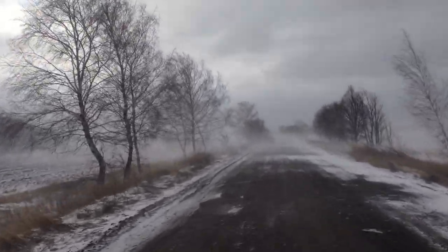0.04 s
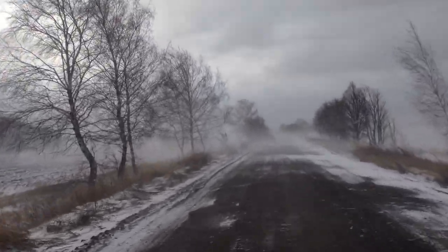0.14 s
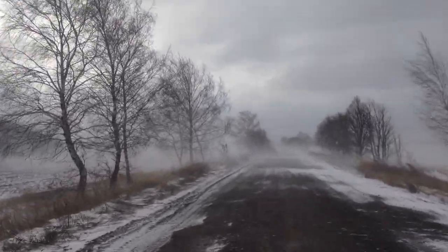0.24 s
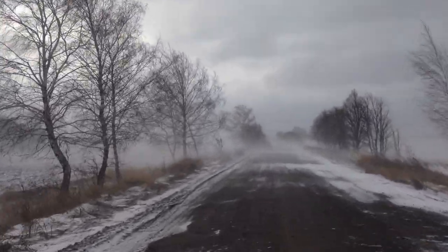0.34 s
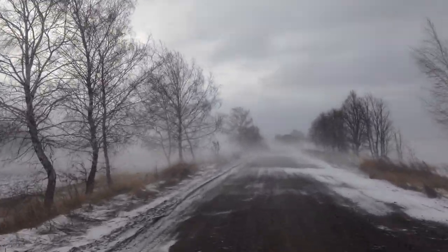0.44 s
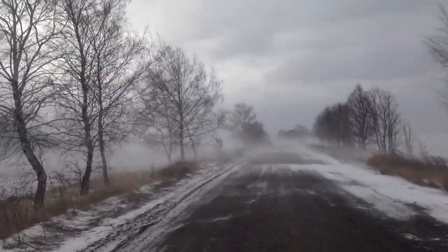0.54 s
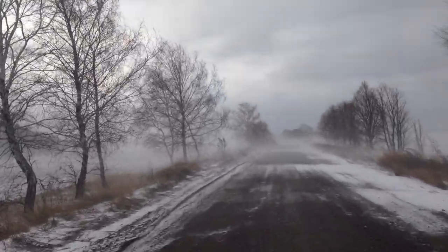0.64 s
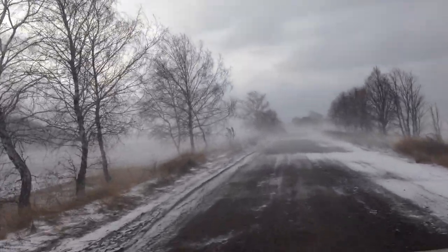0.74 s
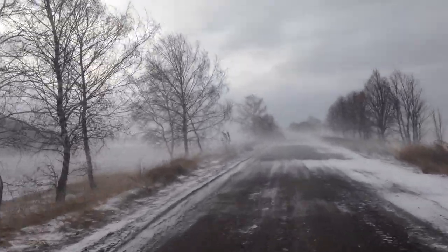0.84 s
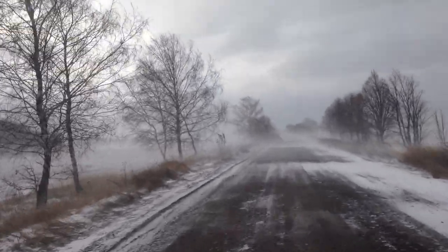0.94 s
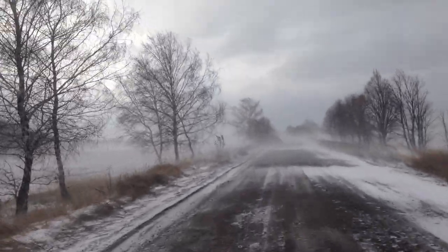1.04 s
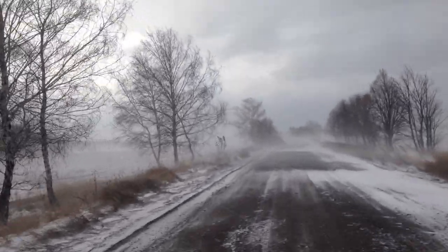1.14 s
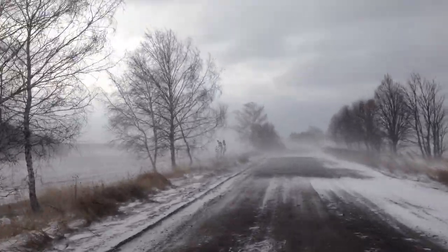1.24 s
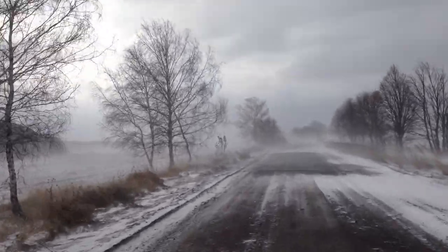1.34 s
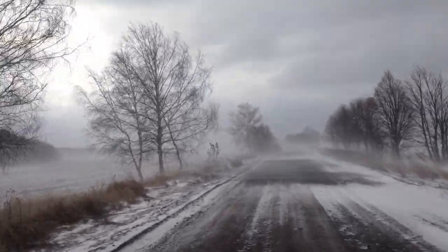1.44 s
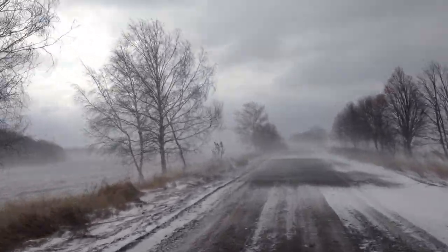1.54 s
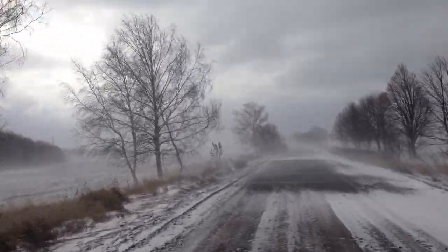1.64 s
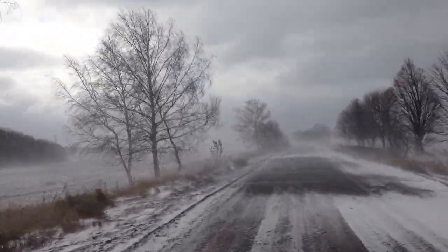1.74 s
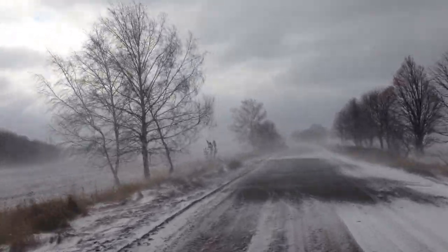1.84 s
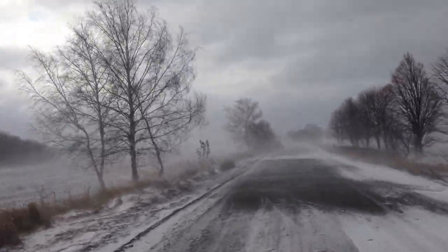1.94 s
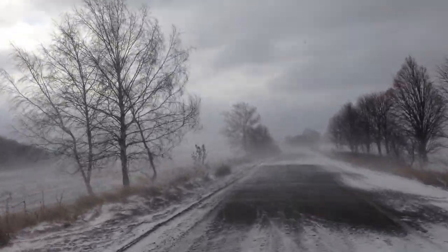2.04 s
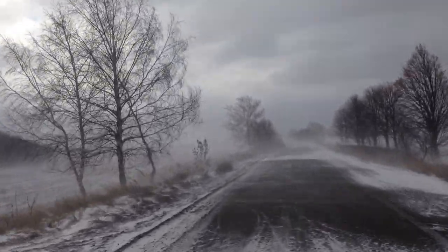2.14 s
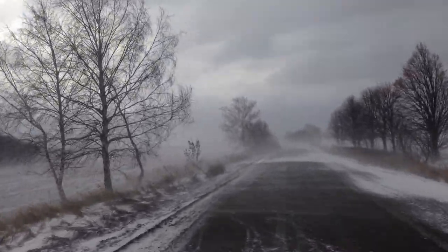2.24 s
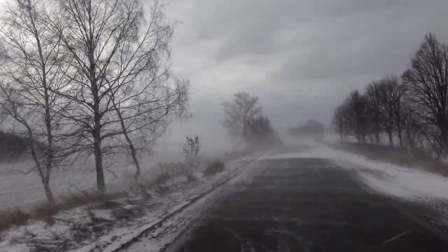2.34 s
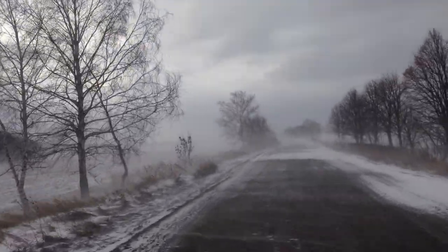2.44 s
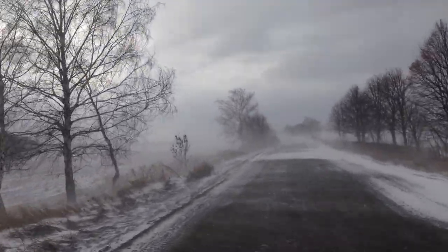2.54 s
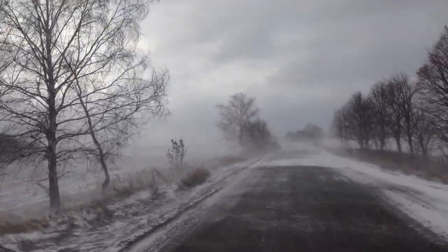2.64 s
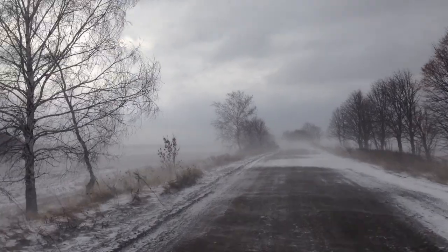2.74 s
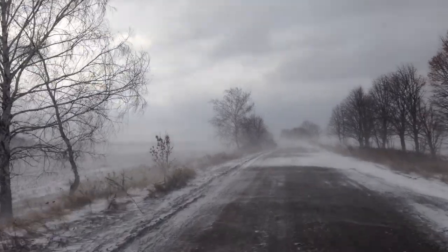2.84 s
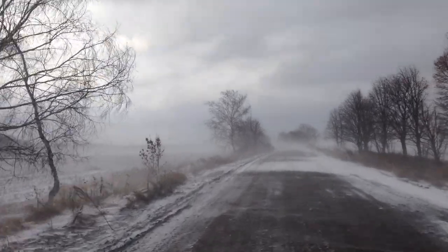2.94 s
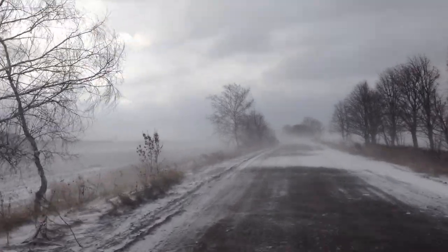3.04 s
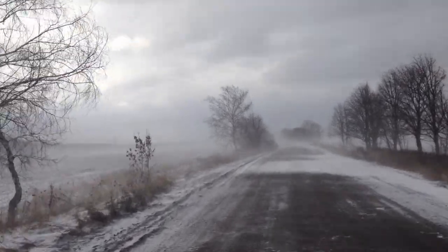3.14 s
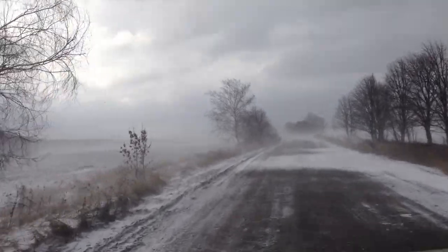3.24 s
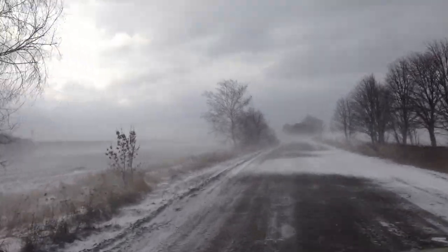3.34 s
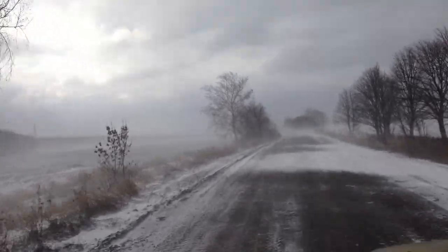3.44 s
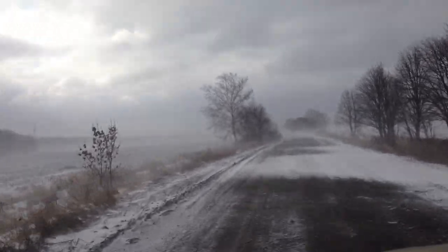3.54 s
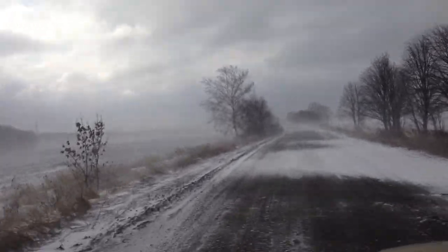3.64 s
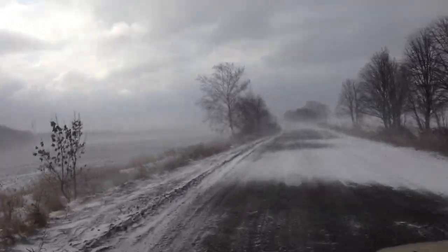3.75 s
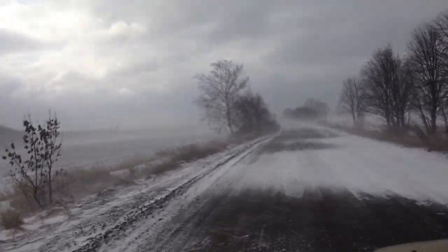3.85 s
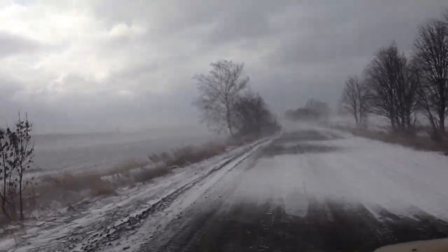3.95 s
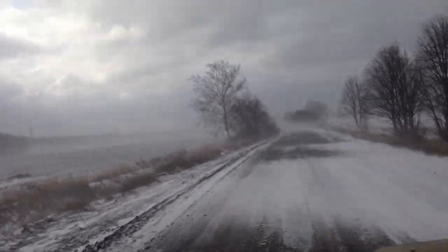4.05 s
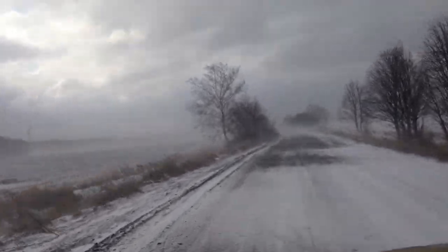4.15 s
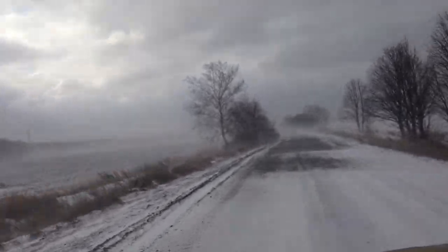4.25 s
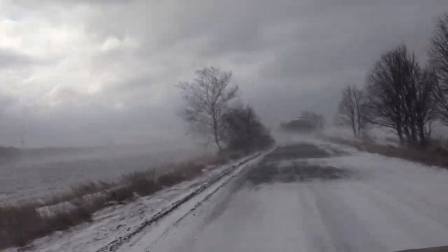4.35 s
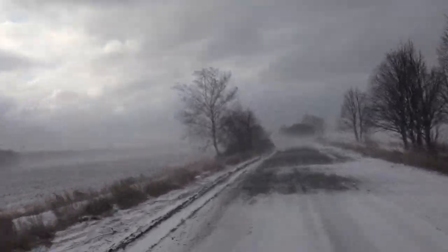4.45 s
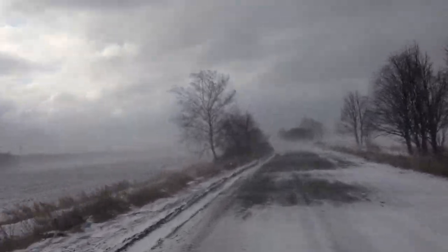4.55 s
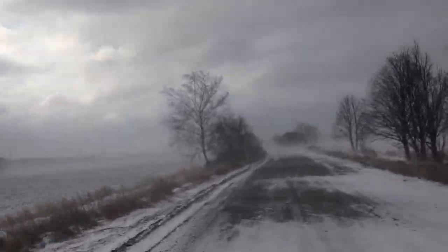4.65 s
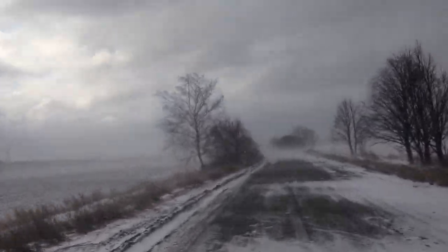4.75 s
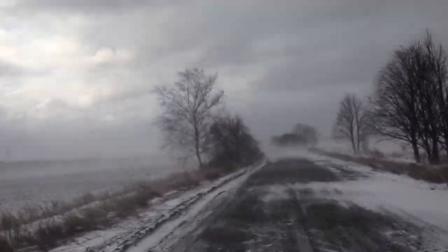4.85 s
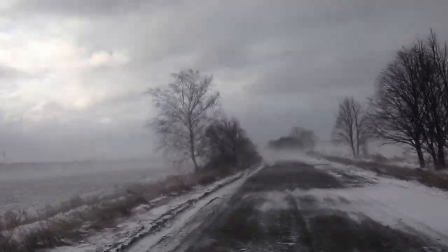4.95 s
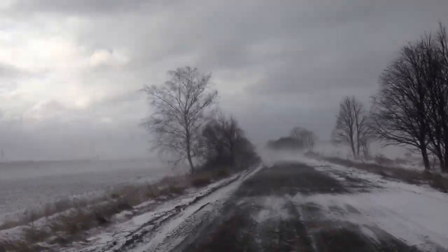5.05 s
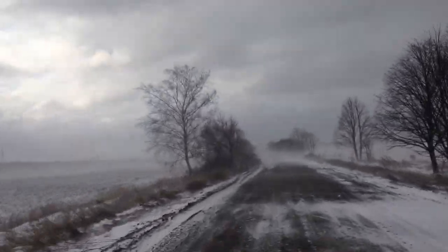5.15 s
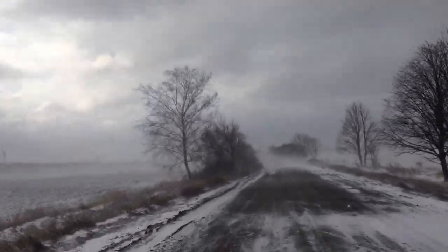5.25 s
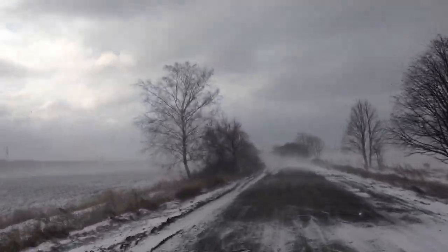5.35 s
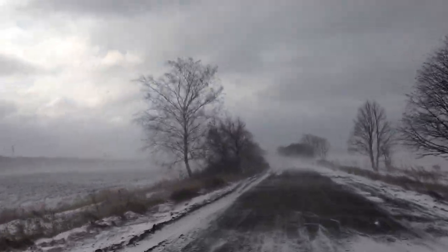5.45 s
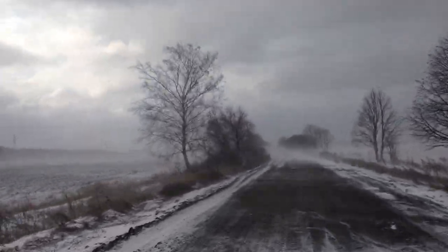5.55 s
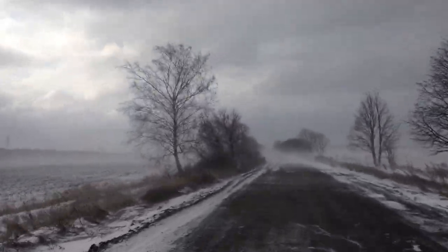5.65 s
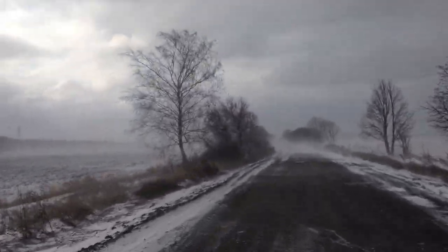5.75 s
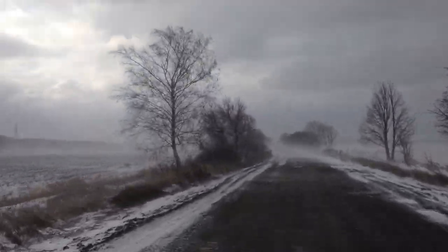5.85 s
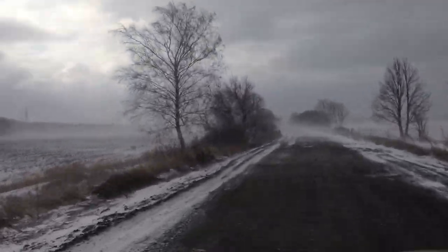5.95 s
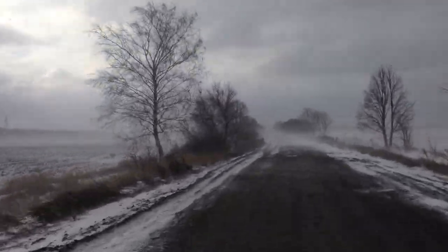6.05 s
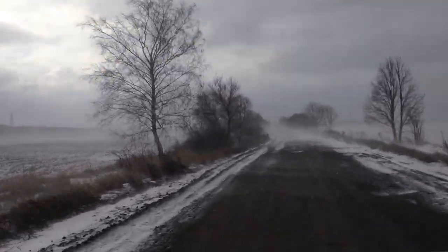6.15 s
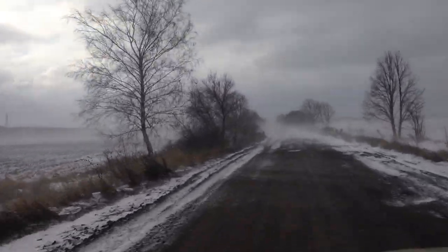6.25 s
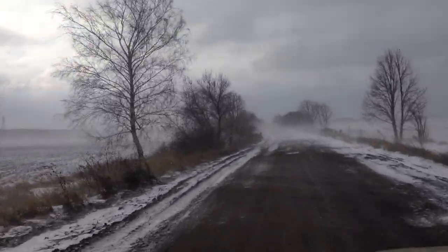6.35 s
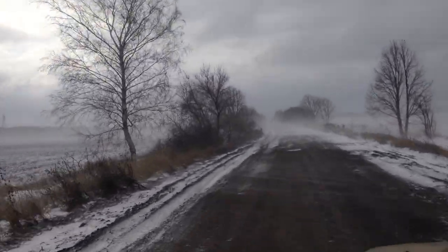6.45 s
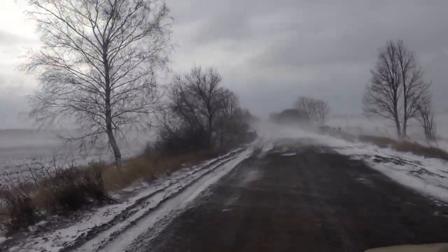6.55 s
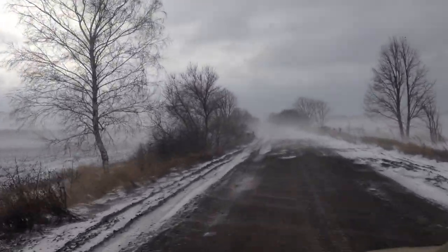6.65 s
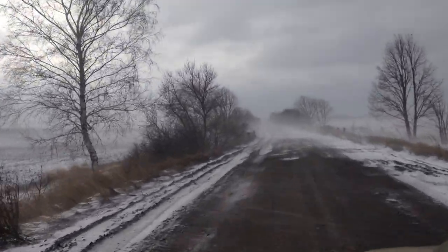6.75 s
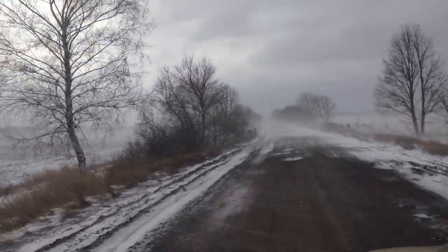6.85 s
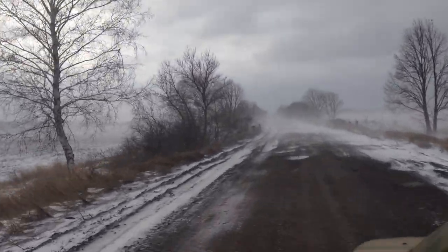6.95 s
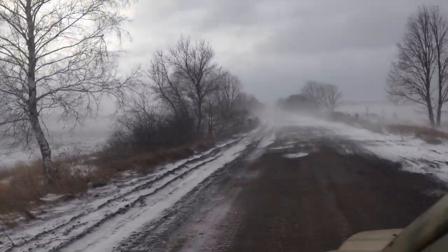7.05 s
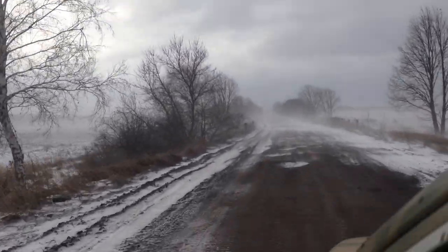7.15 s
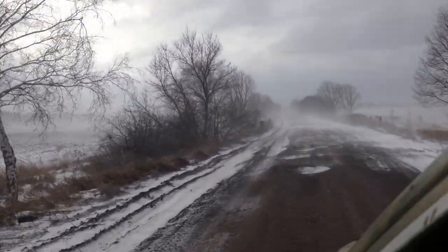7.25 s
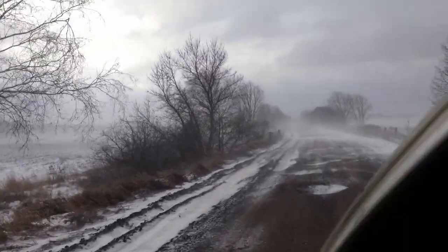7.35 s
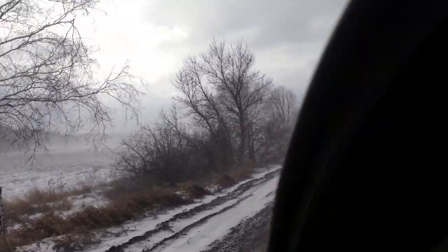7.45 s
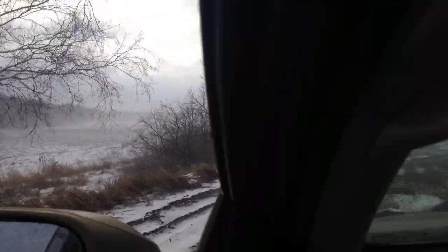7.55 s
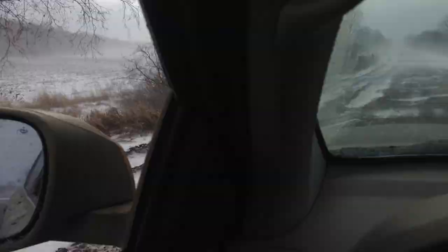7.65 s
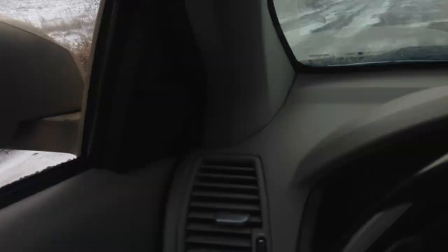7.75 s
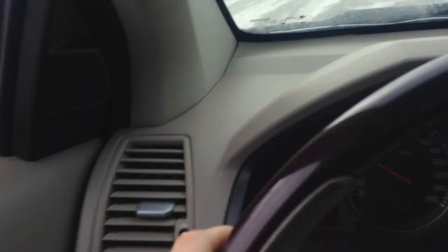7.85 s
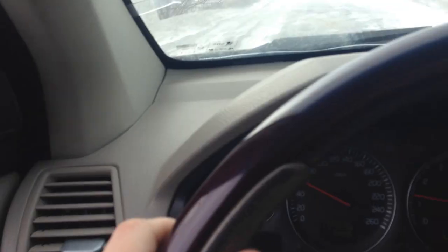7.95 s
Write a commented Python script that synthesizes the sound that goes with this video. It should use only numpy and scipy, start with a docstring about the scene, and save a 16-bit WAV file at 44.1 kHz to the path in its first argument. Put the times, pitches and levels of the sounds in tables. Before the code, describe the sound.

Close, overloaded wind noise on a small mono microphone: scattered low thuds at first, crackling bursts building, then a nearly continuous battering around five seconds, with the background ducking under hard hits. Soft road hiss runs underneath. Gusts thin out, and the microphone is pulled inside past the rushing window gap, leaving muted low car-interior rumble.

```python
"""Gale on a phone's microphone port: short ragged thumps, with rasp and snap on the harder eddies, and smooth pushes.
Each is a puff of shaped noise. Under them: lumpy low buffeting, and tyre and airflow hiss as steady shaped noise.
The phone is held out of the window of a car rolling down a snowy road, then drawn back past a whooshing
window gap into a booming cabin. Its gain control ducks at each hard hit and creeps back."""
import sys
import numpy as np
from scipy import signal
from scipy.fft import rfft, irfft, next_fast_len
from scipy.io import wavfile
from scipy.ndimage import uniform_filter1d

SR = 44100
rng = np.random.default_rng(int(sys.argv[2]) if len(sys.argv) > 2 else 0)


def materialize(psi):
    """Save the field psi as 16-bit PCM at rate SR to the path in sys.argv[1].

    A 1-D psi becomes a single channel; in a 2-D psi each row is a channel.
    """
    bounded = np.clip(np.atleast_2d(psi).T, -1, 1)
    quanta = np.round(bounded * 32767).astype(np.int16)
    wavfile.write(sys.argv[1], SR, quanta)


N = 353196

# harder eddies on the port, before per-layer scaling:
# (centre [s], nominal length [ms], body level [dB], nominal rasp level re body [dB])
EDDY_EVENTS = [(0.032,18,-28.5,-56),(0.152,5.3,-12,-23),(0.165,9.2,-18,-35),(.177,3.6,-17,-18),(0.194,3.9,-16.5,-33),(0.283,2.9,-25,-32),(0.477,10.3,-19,-10),(0.485,13,-12.5,-44),(0.581,5,-28,-38),(0.685,4.8,-20,-0.5),(0.7,18.3,-6.5,-30),(.731,9.9,-20,-32),(.745,7.2,-17,-38),(0.812,17.4,-12,-18),(.871,4.7,-9.5,-26),(.878,17,-19,-44),(.959,20,-11.5,-24),(1.013,13.6,-18.5,-66),(1.061,12.5,-8.5,-17),(1.084,14.7,-12,-31),(1.178,5,-7,-25),(1.218,8.3,-23,-21),(1.261,14,-11.5,-12),(1.338,10.3,-10.5,-27.5),(1.403,9.8,-22.5,-28),(1.451,8.6,-14,-15.5),(1.473,9.8,-21,-22),(1.573,6.9,-12.5,-7),(1.586,9.6,-28.5,-25),(1.81,11,-32,-43),(1.881,9.3,-11.5,-32),(1.943,6,-13.5,-19.5),(1.961,10.3,-20,-42),(2.019,7.7,-24.5,-30),(2.181,4.3,-5.5,-15),(2.223,4.7,-7.5,-9),(2.231,4.9,-16.5,2),(2.289,10.4,-18.5,-21),(2.364,2,-15,-1),(2.379,9.5,-18,-28),(2.422,4.8,-3.5,-16),(2.517,10,-21.5,-30),(2.575,6.8,-14,-23),(2.608,4.2,-17,-11),(2.628,7,-24,-11),(2.654,9.2,-21,-28),(2.664,3.4,-9.5,-8.5),(2.671,3.3,-13,-13),(2.698,5,-13.5,-5),(2.709,8.9,-4,-17.5),(2.725,7.9,-15,-10.5),(2.739,7.1,-19,-25),(2.775,8.2,-29,-37),(2.835,8.4,-29,-43),(2.887,4.8,-15,-11.5),(2.905,19,-15,-35),(2.955,16,-21,-30),(2.994,9.4,-7,-9.5),(3.055,6.4,-17,-33),(3.121,11.2,-12.5,-15),(3.184,5,-25.5,-28),(3.206,4.9,-6.5,-19),(3.302,8.1,-19,-18),(3.425,7.4,-20.5,-50),(3.463,5.1,-13.5,-48.5),(3.515,13,-12,-37),(3.517,17,-10,-35),(3.615,6.1,-14,-40),(3.704,12,-20.5,-43),(3.743,2.1,-12,-7.5),(3.829,3.9,-11,-39),(4.013,13,-22,-36),(4.047,18.7,-7.5,-27),(4.084,4.2,-10.5,-24),(4.116,3.1,-17,-34),(4.152,7.8,-7.5,-17),(4.184,3.8,-8,-4.5),(4.248,2.9,2.5,-11.5),(4.317,2.2,2,-10.5),(4.329,6,-7,-13),(4.348,2.3,-3,-14),(4.387,2.1,-24,-8),(4.414,3.7,-11.5,-18),(4.453,7.9,-11.5,-7),(4.484,4.8,-22.5,-8),(4.505,16,-27,-26),(4.55,7.2,-8,-18),(4.659,7.6,-4.5,-22.5),(4.712,4.3,-3.5,-15.5),(4.729,3.8,-17,-27),(4.783,14.3,-7,-17),(4.793,6.8,-9,-1.5),(4.812,10.6,-8,-12),(4.834,5.9,2,-15),(4.848,8,-10.5,-12),(4.862,5.5,-12,-6),(4.872,5.9,-4,-8),(4.885,5.7,-20,-13),(4.896,2.7,-8,-7),(4.899,16.4,-6,-30),(4.916,14,-6.5,-7),(4.937,27,-10.5,-8),(4.958,9.6,2.5,-17.5),(4.976,17,-11.5,-16),(5.004,14,-7,-13),(5.013,0.8,2,-15),(5.028,9.1,-13,-20),(5.053,5.2,-12.5,-12),(5.103,7.9,4.5,-16.5),(5.123,10,-20,-17),(5.135,2,-3,-12),(5.141,5,-14.5,-4),(5.162,18.6,-1.5,-18),(5.179,14,-9,-14),(5.199,16,-5,-8.5),(5.207,4.5,-4,-17),(5.221,13.4,-12.5,-6),(5.248,28.5,-4.5,-16.5),(5.262,3.1,-12,-10),(5.274,4.7,-7,-20),(5.298,5.5,-5,-17),(5.309,11,-7.5,-42),(5.34,3.8,-4,-15),(5.362,2,-10,-20.5),(5.383,16.6,-11,-21),(5.415,3.1,-16,0),(5.425,13,-6,-13.5),(5.45,5.9,-3.5,-11.5),(5.462,9.6,-7.5,-21),(5.561,5.4,-6.5,-18),(5.619,12,-13,-12),(5.652,11.2,-5.5,-17),(5.828,3.6,-14.5,-38),(5.945,6.7,-5.5,-26.5),(5.988,10.4,-12,-31),(6.002,7.8,-18.5,-21),(6.022,6.8,-21,-36),(6.04,5.4,-28,-28),(6.124,14.7,-13.5,-3.5),(6.136,5.6,-15,-23),(6.15,6.8,-11,-18),(6.159,7.9,-14.5,-4),(6.168,7.5,-10,-9),(6.191,8.1,-16,-19),(6.208,4.8,-5.5,-9.5),(6.235,4.1,-25,-29),(6.281,16,-23.5,-40),(6.336,6,-9.5,-5.5),(6.363,4.2,-20,-16),(6.375,8.5,-22,-24),(6.388,4.9,-18.5,-2.5),(6.439,8.1,-13,-12),(6.452,6.9,-13,-10.5),(6.472,10.5,-14,-30),(6.513,3.1,-6,-5),(6.647,6.6,-14,-27),(6.669,6.5,-11.5,-13),(6.728,17,-29,-28),(6.777,16,-10,-25.5),(6.807,26,-19,-29),(6.856,12,-9,-15),(6.878,6.3,-13,-11.5),(6.902,8.5,-19.5,-31),(7.015,4.1,-16.5,-30),(7.071,12,-35.5,-17),(7.143,9.7,-20.5,-53)]
# gale strength as the level of its slow pressure swings: (time [s], level [dB])
GALE_LEVEL = [(0,-31),(.16,-34.5),(.33,-41.5),(.55,-20.5),(1.05,-28.5),(1.45,-21.5),(1.6,-37),(1.9,-24.5),(2.3,-28),(2.6,-31),(2.9,-18),(3.27,-36.5),(3.55,-23.5),(3.68,-16),(3.78,-9),(3.92,-13),(4.0,-23.5),(4.45,-13),(4.58,-39.5),(4.85,-5),(5.06,-15),(5.2,-5),(5.52,-27),(5.75,-16),(6.07,-27),(6.16,-8.5),(6.55,-20),(6.88,-21.5),(7.05,-28),(7.27,-25),(7.43,-34.5),(8.01,-42)]
# spectrum of the eddies' ragged body: (frequency [Hz], relative level [dB])
EDDY_BODY_COLOUR = [(150, -6.5), (300, -1.5), (450, -1.5), (850, -11), (1500, -21), (2800, -38),
                    (16000, -100)]


def from_db(db):
    """Decibels to amplitude ratio."""
    return 10 ** (np.asarray(db) / 20)


def rms_one(x):
    """Scales a signal to rms 1."""
    return x / np.sqrt(np.mean(x ** 2) + 1e-20)


def in_time(rows):
    """Interpolates each column of a (time, ...) table at every sample."""
    time_s, *columns = np.transpose(rows)
    return [np.interp(np.arange(N) / SR, time_s, column) for column in columns]


def drift(corner_hz):
    """Slow random curve: noise through a double one-pole low-pass, run in for 1 s; rms 1."""
    pole = np.exp(-2 * np.pi * corner_hz / SR)
    slow = signal.lfilter([1], [1, -2 * pole, pole * pole], rng.standard_normal(N + SR))
    return rms_one(slow[SR:])


def coloured(x, colour):
    """Filters a signal by a dB curve drawn on a log-frequency axis; rms 1."""
    hz, db = np.transpose(colour)
    size = next_fast_len(N)
    grid_hz = np.fft.rfftfreq(size, 1 / SR) + 1  # +1 avoids log(0)
    gain = from_db(np.interp(np.log(grid_hz), np.log(hz), db))
    return rms_one(irfft(rfft(x, size) * gain, size)[:N])


def noise(colour):
    """White noise shaped to a spectrum; rms 1."""
    return coloured(rng.standard_normal(N), colour)


def add_puff(out, source, centre_s, length_ms, db):
    """Adds a fast-opening, slow-closing puff with the energy of rms level db held for length_ms."""
    half = max(int(length_ms * SR / 1000), 8)
    start = max(int(centre_s * SR - 0.65 * half), 0)
    gate = np.sin(np.pi * np.linspace(0, 1, 2 * half) ** 0.5) ** 2
    puff = rms_one(source[start:start + 2 * half] * gate)
    out[start:start + 2 * half] += from_db(db) * puff * np.sqrt(.5)  # window is twice length_ms


def road_hiss():
    """Tyres and airflow: broadband turbulent noise plus an airy top, each with its own level curve."""
    # outside hiss: (time [s], hiss level [dB], airy top level [dB])
    road_level = [(0,-35.5,-67),(.5,-31.5,-69),(1.6,-32,-66),(2.15,-32,-60),(2.3,-35.5,-65.5),(3.3,-30.5,-72),(3.5,-31.5,-64),(4,-29.5,-61),(5,-34.5,-68.5),(6,-36.5,-66.5),(7.2,-31.5,-69),(7.42,-32,-67.5),(8.01,-38,-67.5)]
    # spectrum of the hiss: (frequency [Hz], relative level [dB])
    hiss_colour = [(60, -7.5), (124, -7.5), (204, -7.5), (512, -12.5), (866, -22), (1540, -26), (2300, -33),
                   (2900, -37), (4500, -42.5), (7500, -52.5), (11000, -62), (15500, -63.5)]
    # spectrum of the airy top: (frequency [Hz], relative level [dB])
    airy_colour = [(2500, -31.5), (5000, 2), (8000, 0), (12000, -4), (16000, -4.5)]
    hiss_db, airy_db = in_time(road_level)
    return from_db(hiss_db) * noise(hiss_colour) + from_db(airy_db) * noise(airy_colour)


def gap_whoosh():
    """Air through the window gap: mid-band noise swells as the phone nears it, drops faster once past."""
    # spectrum of the whoosh: (frequency [Hz], relative level [dB])
    whoosh_colour = [(300, -22), (600, 5), (950, 10), (1300, 0), (1900, -5), (2600, -33.5), (16000, -100)]
    base_db, rise_db, flutter_db = -44, 10.5, 1.6
    gap_s, near_s, past_s = 7.55, 0.28, 0.11
    t = np.arange(N) / SR
    distance = np.maximum((gap_s - t) / near_s, (t - gap_s) / past_s)
    level_db = base_db + rise_db * np.exp(-distance)
    return from_db(level_db + flutter_db * drift(21)) * noise(whoosh_colour)


def cabin_boom():
    """Cabin air: noise rings resonant modes, faint outside and fading up as the phone enters."""
    # cabin modes: (frequency [Hz], width of one filter pass [Hz], peak gain [dB])
    boom_modes = [(200, 110, 12), (278, 39, -11), (484, 150, -4.5)]
    inside_db, outside_re_inside_db = -34, -29
    enter_s, enter_span_s = 7.32, 0.2
    t = np.arange(N) / SR
    outside = (1 - np.tanh((t - enter_s) / enter_span_s)) / 2
    white, boom = rng.standard_normal(N), np.zeros(N)
    for hz, width_hz, db in boom_modes:
        mode = signal.iirpeak(hz, hz / width_hz, fs=SR)
        once = signal.lfilter(*mode, white)
        boom += from_db(db) * signal.lfilter(*mode, once)
    return from_db(inside_db + outside_re_inside_db * outside) * rms_one(boom)


def buffeting():
    """Slow pressure swings: evened low noise made lumpy, welling up at hard eddies, small eddies on top."""
    # spectrum of the swings: (frequency [Hz], relative level [dB])
    buffet_colour = [(18, -35), (30, -13.5), (42, 17), (60, 20.5), (80, 23), (120, 12), (200, -12.5),
                     (400, -34), (16000, -140)]
    swell_ms, swell_re_body_db = 43.2, -12
    lump_db, small_db = 2.0, -10.5
    swell = np.zeros(N)
    for centre_s, _, body_db, _ in EDDY_EVENTS:
        add_puff(swell, np.ones(N), centre_s, swell_ms, body_db + swell_re_body_db)
    level = np.hypot(from_db(in_time(GALE_LEVEL)[0]), swell)
    low = noise(buffet_colour)
    low = rms_one(low / np.sqrt(uniform_filter1d(low ** 2, size=1800)))  # evened over 41 ms
    bursts = from_db(8.1 * np.minimum(drift(35), 2.2))
    small = coloured(rng.standard_normal(N) * bursts, EDDY_BODY_COLOUR)
    return level * (low * from_db(lump_db * drift(14.4)) + from_db(small_db) * small)


def pushes():
    """Smooth low pushes that barely tear: puffs of low noise."""
    # pushes: (centre [s], length [ms], level [dB])
    push_events = [(.095,16,-38),(.436,18,-24),(.563,7.6,-29),(0.641,10,-20),(.731,12,-10),(0.982,7,-7),(1.015,8.2,-13),(1.218,17,-17),(1.32,11,-27),(1.473,7.7,-3.5),(1.655,25,-23.5),(1.851,16,-16),(1.961,12.4,-10.5),(2.44,10,-17),(3.403,24,-17.5),(3.704,9.9,1.5),(3.746,12,1.5),(3.778,16,-3.5),(3.855,36,-15.5),(3.886,12,-12),(4.01,11.6,-6),(4.115,7.9,-5.5),(4.583,14,-11.5),(4.976,16,-7),(5.005,14,5.5),(5.179,16,-1),(5.62,8.6,-5.5),(5.847,9,-13),(6.122,14.4,0),(6.281,19,-8),(6.372,9,-12),(6.438,11,-4),(6.499,12,-3.5),(6.728,27,-20),(6.844,6.7,-11),(6.956,10,-16),(7.275,11,-23)]
    # spectrum of a push: (frequency [Hz], relative level [dB])
    push_colour = [(25, -21), (50, -3.5), (90, -3), (150, -3.5), (250, -10.5), (500, -49), (16000, -130)]
    out = np.zeros(N)
    push = noise(push_colour)
    for centre_s, length_ms, db in push_events:
        add_puff(out, push, centre_s, length_ms, db)
    return out


def faint_eddies(count):
    """Lesser eddies as EDDY_EVENTS rows: one per equal time slot at random, stronger when the gale is."""
    shelter_s = 7.2  # phone passes behind the window frame
    at, size, span, rasp = rng.standard_normal((count, 4)).T
    centre_s = shelter_s * (np.arange(count) + .5 + 0.43 * np.tanh(at)) / count
    gale_db = np.interp(centre_s, *np.transpose(GALE_LEVEL))
    length_ms = 12.7 * np.exp(0.3 * span)
    body_db = -24.5 + 0.3 * gale_db + 6.5 * size
    rasp_db = -37.5 + 3.0 * rasp
    return np.transpose([centre_s, length_ms, body_db, rasp_db])


def eddies():
    """Each eddy: a low thump, a ragged body, a rasp of torn flow, and a snap steepening with the rasp."""
    # layer spectra, thump to snap: (frequency [Hz], relative level [dB])
    thump_colour = [(40, 0.5), (70, -5.5), (120, 14.5), (200, 9), (350, 2), (600, -60), (16000, -130)]
    rasp_colour = [(900, -0.5), (1600, 6.5), (2600, 3.5), (3800, -4), (6000, -26), (9000, -68),
                   (17000, -71)]
    snap_colour = [(2500, -22.5), (4500, 5), (6000, 0.5), (8500, -7.5), (12000, -13.5), (16000, -22.5)]
    thump_min_ms, body_stretch, rasp_share = 9.54, 1.217, 0.81
    thump_base_db, thump_follows_gale, thump_spread_db = 5, 0.34, 2.0
    snap_steepness, snap_per_thump = 1.705, 0.12  # dB per dB; a strong push overdrives the capsule
    ragged = from_db(9.76 * np.minimum(drift(280), 1.6))  # sub-bursts of tearing flow, shared by the layers
    white = rng.standard_normal(N)
    thump = noise(thump_colour)
    body = coloured(white * ragged ** 0.69, EDDY_BODY_COLOUR)
    rasp = coloured(white * ragged, rasp_colour)
    snap = coloured(white * ragged ** 0.97, snap_colour)
    out = np.zeros(N)
    for centre_s, ms, body_db, rasp_db in [*EDDY_EVENTS, *faint_eddies(count=70)]:
        gale_db = np.interp(centre_s, *np.transpose(GALE_LEVEL))
        # thump level re body
        thump_db = thump_base_db + thump_follows_gale * (gale_db - body_db)
        thump_db += thump_spread_db * rng.standard_normal()
        snap_db = snap_steepness * (body_db + rasp_db) + snap_per_thump * thump_db - 5.5
        add_puff(out, thump, centre_s, max(ms, thump_min_ms), body_db + thump_db)
        add_puff(out, body, centre_s, ms * body_stretch, body_db)
        add_puff(out, rasp, centre_s, ms * rasp_share, body_db + rasp_db + 3.0)
        add_puff(out, snap, centre_s, ms * rasp_share, snap_db)
    return out


def scene():
    """Sums all sources to one channel."""
    background = road_hiss() + gap_whoosh() + cabin_boom()
    return (background + buffeting() + pushes() + eddies())[None]


def record(dry):
    """Phone input: bass cut, gain control that ducks and climbs back steadily, rounded peaks, treble cut."""
    bass_cut_hz, treble_stop_hz = 34, 15650
    limit_db, release_db_per_s, sense_ms = -13.5, 23, 9.9
    grip = 0.71  # share of the excess taken back
    ceiling = 0.71  # amplitude
    dry = signal.sosfilt(signal.butter(4, bass_cut_hz, "high", fs=SR, output="sos"), dry)
    power = uniform_filter1d(dry[0] ** 2, size=int(sense_ms * SR / 1000))
    level_db = 10 * np.log10(np.abs(power) + 1e-12)
    over_db = grip * np.maximum(level_db - limit_db, 0)
    climb_db = release_db_per_s * np.arange(N) / SR
    duck_db = np.maximum.accumulate(over_db + climb_db) - climb_db  # instant drop, linear release
    wet = dry * from_db(-duck_db) / ceiling
    wet = ceiling * wet / (1 + wet ** 4) ** (1 / 4)
    return signal.sosfilt(signal.cheby2(16, 45, treble_stop_hz, fs=SR, output="sos"), wet)


dry = scene()
out = record(dry)
materialize(out)
```